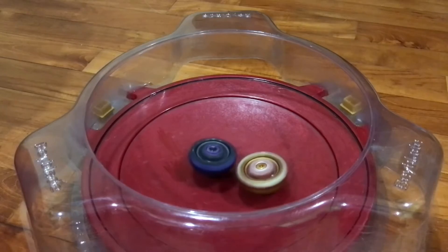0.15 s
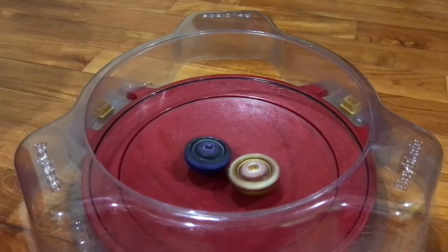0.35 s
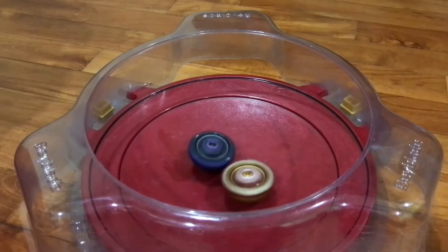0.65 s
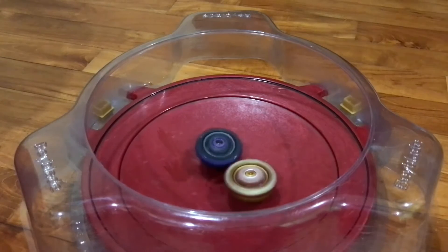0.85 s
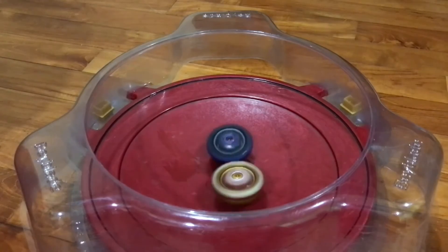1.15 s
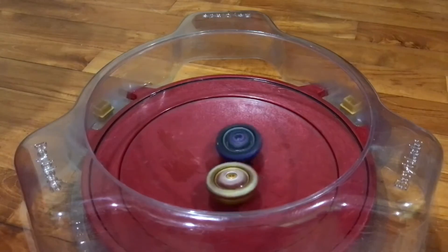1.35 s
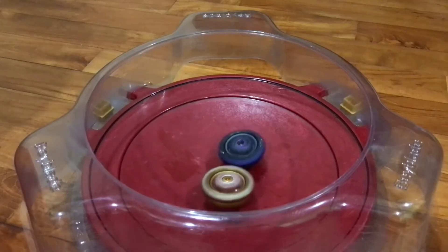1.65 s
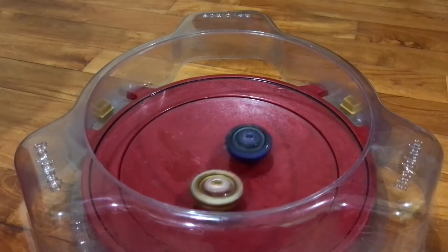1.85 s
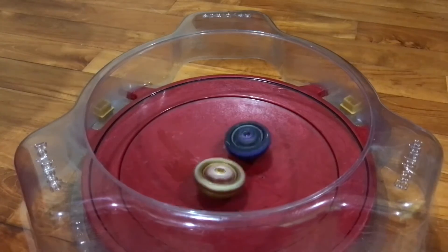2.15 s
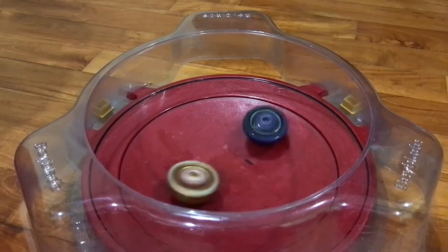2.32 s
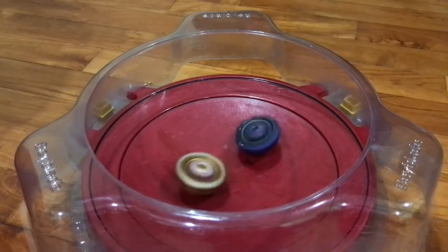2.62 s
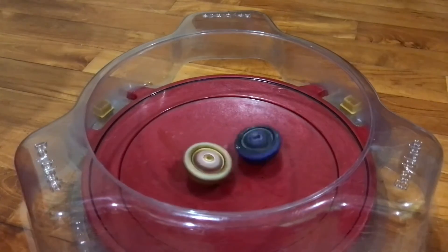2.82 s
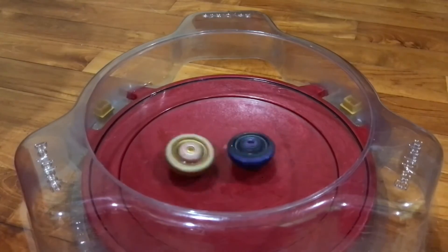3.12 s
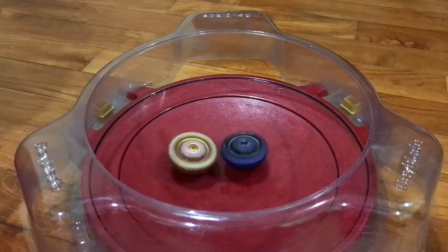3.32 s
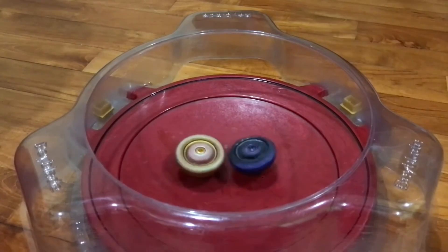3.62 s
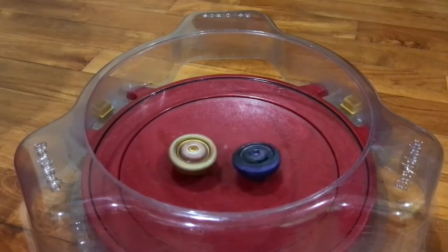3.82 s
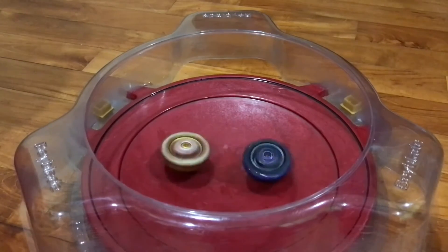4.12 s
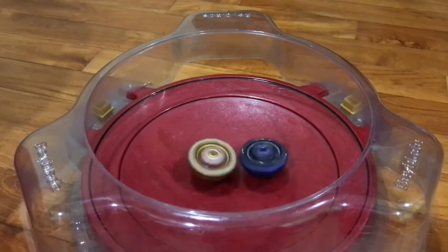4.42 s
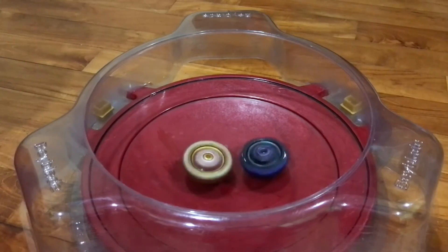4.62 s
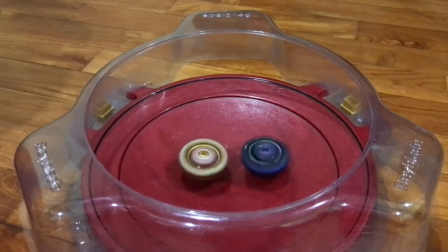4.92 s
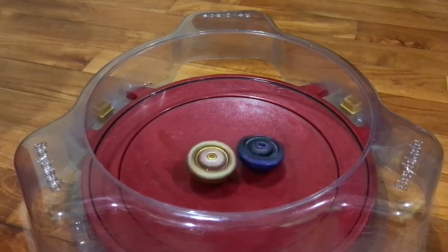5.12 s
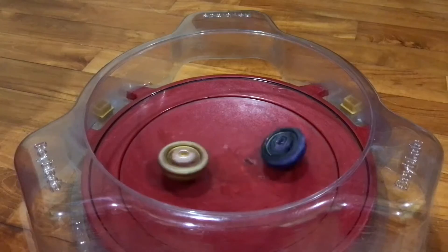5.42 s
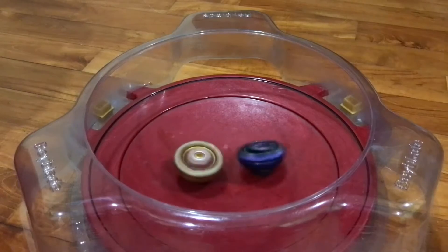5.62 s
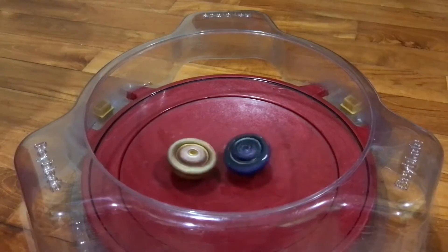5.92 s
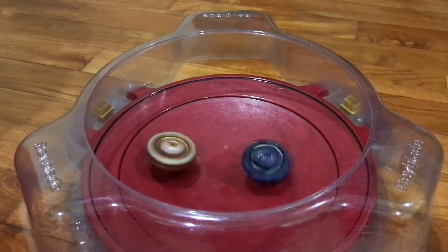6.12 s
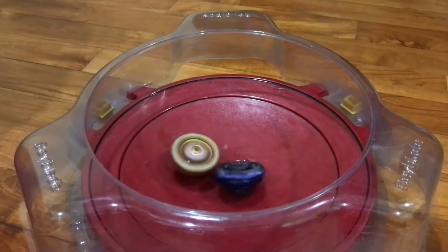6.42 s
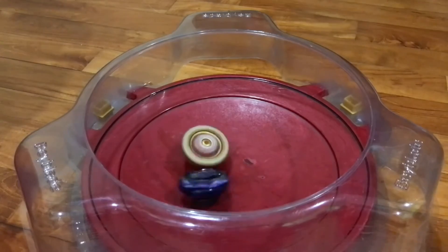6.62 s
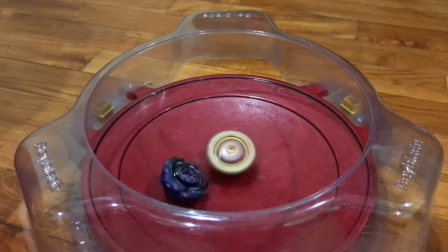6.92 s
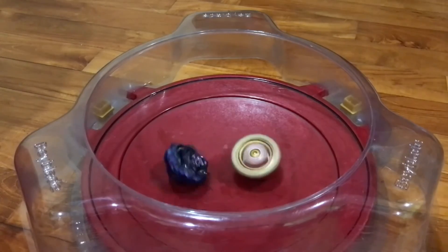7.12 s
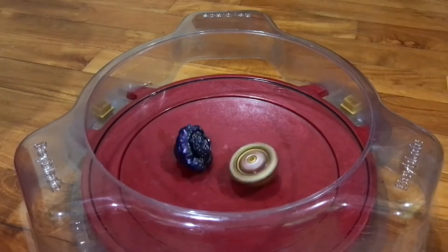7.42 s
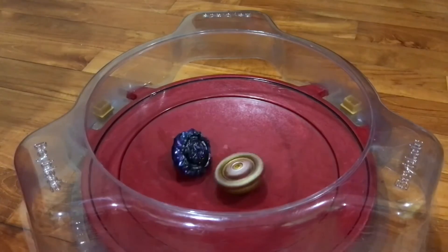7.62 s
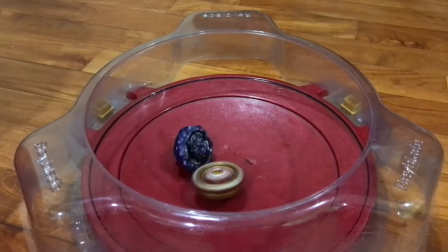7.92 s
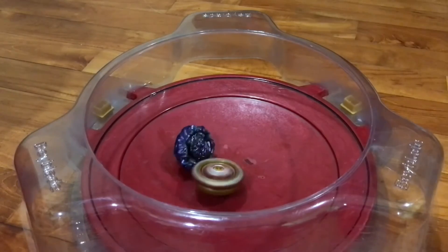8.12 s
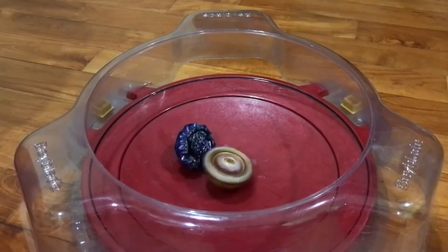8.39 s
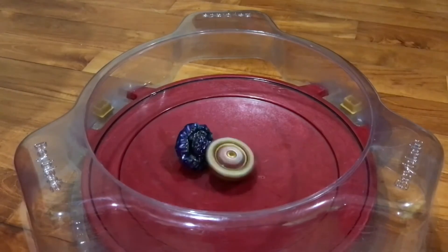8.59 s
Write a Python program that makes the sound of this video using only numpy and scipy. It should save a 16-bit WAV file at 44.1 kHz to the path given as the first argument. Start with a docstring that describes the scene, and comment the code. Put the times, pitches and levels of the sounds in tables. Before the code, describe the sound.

A close microphone in a small room catches toy tops spinning and colliding on a thin plastic floor. Crisp metal clacks dominate the first six seconds, with fluttering tip rumble, small ticks and two tiny squeaks between them. Then clashes become sparse, and a toppling top drums, rubs and scrapes unevenly, with rapid faint chirps, a run of even ticks and late isolated cracks over low room noise.

```python
"""Metallic clashes, often double, over a once-a-turn rumble: two metal-rimmed toy tops spin down, close by.
Each clash cracks, knocks the shell, thumps the plastic arena floor and rings the rims; noise and modal filters.
Worn tips drum and grind on the floor; tilted rims tick and rub, tips squeak, and hard blows heave the arena.
Near the end one top leans over, scrapes and chirps. Low air noise lies under it all.
The opening scrape is the dying ring of a clash before the start."""
import sys
import numpy as np
from scipy import signal
from scipy.fft import rfft, irfft, next_fast_len
from scipy.io import wavfile
from scipy.ndimage import uniform_filter1d, map_coordinates

SR = 44100
rng = np.random.default_rng(int(sys.argv[2]) if len(sys.argv) > 2 else 0)


def int16_out(signal):
    """Quantize to a 16-bit WAV file."""
    q = np.round(np.clip(np.atleast_2d(signal).T, -1, 1) * 32767)
    wavfile.write(sys.argv[1], SR, q.astype(np.int16))


N = 385875
TIME = np.arange(N) / SR  # s

# bright hiss of a metal contact: f/Hz, density/dB
SIZZLE = [(3000, -29.5), (6500, -11.5), (8400, -2), (9600, 2), (10500, -5), (11700, 0), (13500, -2),
          (15500, -2.5)]


def amp(db):
    """Decibels to gain."""
    return 10 ** (np.asarray(db) / 20)


def unit(x):
    """Scale to rms 1."""
    return x / np.sqrt(np.mean(x ** 2) + 1e-20)


def along(points, hz):
    """Interpolate (Hz, value) points on a log frequency axis."""
    f, v = np.transpose(points)
    return np.interp(np.log(hz + 1), np.log(f + 1), v)


def curves(rows):
    """One value per sample for each column after the time."""
    s, *cols = np.transpose(rows)
    return [np.interp(TIME, s, c) for c in cols]


def wobble(rate_hz):
    """Smooth random curve, rate_hz knots a second."""
    knots = rng.standard_normal(int(N * rate_hz / SR) + 4)
    return map_coordinates(knots, [TIME * rate_hz])


def filtered(x, response):
    """x times a complex response of frequency."""
    m = next_fast_len(len(x) + 8192)
    spectrum = rfft(x, m) * response(np.fft.rfftfreq(m, 1 / SR))
    return irfft(spectrum, m)[:len(x)]


def noise(spectrum, ripple_db=0, spacing_hz=70):
    """Coloured noise of rms 1; the ripple stands for the crowded fixed resonances of the parts."""
    knots = rng.standard_normal(2000)

    def gain(hz):
        ripple = ripple_db * np.interp(hz / spacing_hz, np.arange(len(knots)), knots)
        return amp(along(spectrum, hz) + ripple)

    return unit(filtered(rng.standard_normal(N), gain))


def add(track, s, sound):
    """Mix a sound into a track at time s."""
    part = track[max(round(s * SR), 0):][:len(sound)]
    part += sound[:len(part)]


def swells(rows):
    """Sum of gains, each rising to its row's level by the start, holding to the end and dying away."""
    rise_db_per_s, fall_db_per_s = 249.5, 209.5
    total = 0
    for start, end, db in rows:
        rise_db = rise_db_per_s * np.maximum(start - TIME, 0)
        fall_db = fall_db_per_s * np.maximum(TIME - end, 0)
        total = total + amp(db - rise_db - fall_db)
    return total


def room(x, wet_db, size=16000):
    """x plus a noise tail; bands of negative t60 grow, so a late narrow echo near 5.5 kHz dominates it."""
    # f/Hz, t60/s (negative: the band grows)
    decay = [(150, -0.16), (500, 0.25), (2000, 0.47), (10000, -0.29)]
    # f/Hz, initial level/dB
    colour = [(150, 1.5), (400, 5.5), (1200, 8.5), (9000, -1.5)]
    hz, t, z = signal.stft(rng.standard_normal(size), SR, nperseg=256)
    level_db = along(colour, hz)[:, None] - 60 * t / along(decay, hz)[:, None]
    tail = signal.istft(z * amp(level_db), SR, nperseg=256)[1]
    tail = tail * (1 - np.exp(-np.arange(len(tail)) / SR / 0.0035))
    wet = amp(wet_db) * signal.fftconvolve(x, tail / np.linalg.norm(tail))
    return wet + np.pad(x, (0, len(wet) - len(x)))


def air():
    """Low noise of the room, drifting slowly in level."""
    # f/Hz, density/dB
    air_spectrum = [(20, -29), (35, -22), (49, 0.5), (62, -4.5), (120, -5.5), (200, -9), (400, -21),
                    (1000, -20), (3000, -35.5), (8000, -31.5), (16000, -47)]
    return amp(-56.5 + wobble(3)) * noise(air_spectrum)


def arena(force):
    """The thin floor answers a force with its drum-like modes, as parallel band-passes."""
    # f/Hz, width/Hz, level/dB
    floor_modes = [(72, 17, -19), (117, 9.5, -9.5), (143.5, 23, -3), (238, 56, -10.5), (305.6, 45.6, 2),
                   (340.5, 21.5, 5.5), (433, 60, -17.5), (520.5, 37, -17), (581, 18, -11.5), (666, 24, -34),
                   (920, 100, -18), (1080, 49, -21)]
    return filtered(force, lambda f: sum(amp(db) * 1j * f * w / (c * c - f * f + 1j * f * w)
                                         for c, w, db in floor_modes))


def turns():
    """Turns made so far by the drumming top; friction takes the same share of the spin every second."""
    start_spin_hz, spin_life_s = 61.1, 11
    return start_spin_hz * spin_life_s * (1 - np.exp(-TIME / spin_life_s))


def leaning(s):
    """How far the slowing top has leaned over at time s, 0 to 1."""
    lean_from_s, lean_full_s = 5.4, 6.7
    return np.interp(s, [lean_from_s, lean_full_s], [0, 1])


def bumps(main_db, scatter_db, jitter_turns, count=7):
    """Tip flaws strike the floor in the same order every turn, drifting as it tilts; one is the largest."""
    turn = turns()
    whole = np.arange(int(turn[-1]))[:, None]

    def drift():
        steps = rng.standard_normal((500, count))
        return unit(uniform_filter1d(steps, size=8, axis=0))[:len(whole)]

    flaw = np.arange(count)
    angle = (flaw + .3 * drift() * (flaw > 0)) / count  # turns
    jitter = jitter_turns * rng.standard_normal((500, count))[:len(whole)]
    at = np.interp(whole + angle + jitter, turn, np.arange(N))  # samples
    force = amp(scatter_db * drift() + main_db * (flaw == 0))
    force = force / np.sqrt(np.sum(force ** 2, axis=1, keepdims=True))
    return unit(np.bincount(at.astype(int).ravel(), force.ravel(), N))


def strokes(bite_db, second_db, uneven_db):
    """Envelope of rms 1: the worn side of the tip bites once a turn, less firmly halfway between."""
    angle = 2 * np.pi * (turns() - .08)
    level_db = bite_db * np.cos(angle) + second_db * np.cos(2 * angle) + uneven_db * wobble(110)
    return unit(amp(level_db))


def rolling():
    """Bumps drum the floor under scraping and grinding noise in strokes; a leaning top drums less evenly."""
    # fast runs on the edge of a tip: start/s, end/s, rumble/dB
    runs = [(0, .03, -46.5), (.255, .6, -42), (1.43, 1.54, -37.5), (2.12, 2.33, -35.5), (2.64, 2.8, -36.5),
            (2.93, 3.14, -39), (5.67, 5.7, -45.5), (6.21, 6.23, -44)]
    # scraping and grinding noise under the tips; the first row is the dying ring of a clash before the start:
    # t/s, rumble/dB, scrape drive/dB before the trims below
    tip_levels = [(0, -54, -40), (.13, -60, -61), (.9, -58.5, -57.5), (3.3, -65, -64.5), (3.6, -56.5, -60),
                  (5.1, -59, -64), (5.5, -50, -57.5), (5.97, -59, -63.5), (6.4, -53, -58),
                  (6.75, -51.5, -59.5), (7.03, -41.5, -59.5), (7.36, -47, -58), (7.5, -42.5, -52),
                  (7.9, -41.5, -52.5), (8.05, -54, -63.5), (8.24, -42.5, -59), (8.52, -43.5, -58),
                  (8.68, -58.5, -66)]
    # push of a rolling top on the floor: f/Hz, gain/dB
    weight = [(60, 3), (115, 6), (190, 7.5), (300, -1), (380, 0.5), (600, 1.5), (1100, -2)]
    # grit under the tip: f/Hz, density/dB
    grit_spectrum = [(400, -15.5), (750, -12.5), (980, 15), (1300, -19), (1520, 13), (1700, -5), (2000, 1),
                     (2700, 8.5), (3400, -12), (5000, -9.5), (9000, -23.5), (16000, -32)]
    # metal scrape: f/Hz, density/dB
    scrape_spectrum = [(1500, -35.5), (3500, -5), (4700, -3), (5600, 2), (7200, -2), (8200, -6.5),
                       (8550, 8), (9000, -5), (10500, -13), (15500, -8)]
    run_grit_db, run_scrape_db = -12, -24  # re the rumble of a run
    run = swells(runs)
    drumming, scraping = amp(curves(tip_levels))
    pulses = bumps(main_db=7.5, scatter_db=4.0, jitter_turns=0.0037)
    bite = strokes(bite_db=3.2, second_db=3, uneven_db=2.5)
    force = pulses + (0.46 + 0.75 * leaning(TIME)) * bite * rng.standard_normal(N)
    # the weight of a top rocks the whole arena, so its slow modes carry more of the rumble
    push = filtered(force, lambda hz: amp(along(weight, hz)))
    rumble = amp(0.78 * wobble(14)) * np.hypot(run, drumming) * unit(arena(push))
    grit_level = np.hypot(amp(run_grit_db) * run, amp(-6.0) * scraping)
    grit = grit_level * bite * noise(grit_spectrum, ripple_db=-0.5)
    scrape_level = np.hypot(amp(run_scrape_db) * run, amp(-2.5) * scraping)
    scrape = scrape_level * bite * noise(scrape_spectrum, ripple_db=3.5)
    return room(rumble + grit + scrape, wet_db=-10.5)[:N]


def contacts():
    """Every blow, and the light touch that comes just before some of them."""
    # rim on rim: t/s, lead of a light first touch/s (0: none), base crack/dB, brightness/dB,
    # then re the base crack: shell knock/dB, floor thump/dB, long ring/dB, short ring/dB, high ring/dB
    rim_blows = [(0.0314, 0.0012, -13, 0.5, -39, -37, -36.5, -21, -32),
                 (0.0483, 0, -14.5, 3, -23, -34, -39.5, -24, -49),
                 (0.1453, 0.0024, -16.5, -4.5, -13, -17.5, -46, -39, -47),
                 (.284, 0.0019, -15, -1, -15, -27, -46, -47, -46),
                 (0.3458, 0, -17.5, -1.5, -17.5, -27, -43, -36, -44),
                 (.3685, 0, -23.5, -2, -13, -25, -44.5, -34, -43),
                 (0.5337, 0, -15, 0.5, -17.5, -22, -47, -40.5, -45),
                 (0.7492, 0.0025, -26.5, -2, -24, -21, -47, -44, -42),
                 (0.7617, .003, -12, 2, -22.5, -21.5, -41, -44.5, -45),
                 (0.9403, 0.0021, -32, 1, -25, -21, -49, -42, -35),
                 (0.9466, 0.0023, -10, 1, -17, -20, -49.5, -39, -38),
                 (.9509, 0, -13.5, -6, -22.5, -18.5, -48, -45, -41),
                 (1.1782, 0.00096, -11, -0.5, -18, -18, -45.5, -36.5, -39.5),
                 (1.1828, 0.0029, -13.5, 8, -13, -22, -45.5, -41, -40.5),
                 (1.2886, 0, -11.5, -0.5, -14.5, -16, -48, -35, -34),
                 (1.3644, 0.0016, -15.5, -3, -13.5, -19, -48.5, -43, -44.5),
                 (1.5234, 0.0045, -12.5, 3, -30, -27, -48, -45, -43),
                 (1.5298, 0, -13.5, 5, -17, -23, -42, -50.5, -47),
                 (1.691, 0, -15.5, 2.5, -19.5, -36, -39, -33, -42.5),
                 (1.6971, 0, -11, -2, -18.5, -28, -37, -38, -37),
                 (1.84, .008, -7.5, 2.5, -19, -20, -33, -32, -23),
                 (2.252, 0.0022, -15, -2.5, -23, -24, -46, -45, -34),
                 (2.2582, 0.0049, -9.5, 1, -17.5, -23, -43, -45, -38),
                 (2.7576, 0.0047, -11, -4.5, -20.5, -21.5, -43, -32, -41),
                 (2.9552, 0.0032, -15.5, 2.5, -21.5, -27, -47.5, -47, -43),
                 (2.9602, 0, -13, 6.5, -16.5, -20.5, -48.5, -45, -43),
                 (3.0936, 0.001, -22.5, -2, -16, -20, -39.5, -29, -27),
                 (3.122, 0.0054, -11.5, 0, -18, -21, -54, -38, -28),
                 (3.3855, 0.011, -10.5, -2.5, -15, -24.5, -34, -39, -29),
                 (3.6442, 0.011, -13, 1.5, -18, -16.5, -32, -38.5, -28),
                 (3.7591, 0.00036, -9, 6, -23, -22.5, -47.5, -42, -36),
                 (3.7686, 0, -14, 1, -19.5, -15, -46, -42, -39),
                 (4.0253, 0, -12, 6, -29, -17, -48.5, -41.5, -47),
                 (4.031, 0, -12, 0, -19, -11.5, -47, -42.5, -46),
                 (4.433, 0.0013, -11.5, -1, -18, -28, -45, -22, -39),
                 (4.4519, 0, -16, 2, -33.5, -26, -40, -33, -44),
                 (4.5371, 0.014, -19.5, -2, -10, -19, -42, -36, -39),
                 (4.6234, 0, -18.5, -3.5, -8, -18.5, -45, -37, -34.5),
                 (4.8402, 0.0022, -14, -1, -16.5, -9.5, -48, -41, -30),
                 (5.1601, 0.0011, -19, 5.5, -17, -26.5, -45.5, -42, -47.5),
                 (5.2061, 0, -8.5, 2.5, -19.5, -25, -51, -42.5, -24),
                 (5.7187, 0.00072, -10.5, -0.5, -15.5, -20, -36.5, -34, -38),
                 (5.777, 0.00049, -16, -1.5, -15.5, -18, -32, -41, -41),
                 (6.0202, 0.0011, -8, 0, -22.5, -17.5, -48, -35, -45),
                 (6.4672, 0.00093, -12.5, 2.5, -17.5, -13.5, -48, -45, -41),
                 (6.5305, 0.0068, -19, 1.5, -11, -18.5, -48, -45, -37),
                 (6.613, 0.00099, -24.5, 0.5, -13.5, -17.5, -43, -40, -39),
                 (7.9283, 0.0013, -16, -0.5, -12.5, -12, -35.5, -40, -37),
                 (8.296, 0.0029, -16, 0.5, -17, -12, -48, -49, -41),
                 (8.6835, 0.0023, -29, -4, -17, -24, -45, -39, -44),
                 (8.711, 0, -15.5, 0, -13.5, -23.5, -42, -42, -44)]
    touch_db = -10  # re the blow that follows
    blows = [(s, db, *colour) for s, lead, db, *colour in rim_blows]
    touches = [(s - lead, db + touch_db, *colour) for s, lead, db, *colour in rim_blows if lead > 0]
    return np.transpose(blows + touches)


def bursts(times, levels_db, hold_s, fade_s, fade_db, wet_db, t60_s, size=18000):
    """Envelope of blows: each chatters for an instant, fades in the body and is carried on by the room."""
    t = np.arange(size) / SR
    chatter = (1 - np.exp(-t / 0.00017)) / np.sqrt(1 + (t / hold_s) ** 4)
    direct = chatter + amp(fade_db) * np.exp(-t / fade_s)
    tail = (1 - np.exp(-t / 0.0036)) * amp(wet_db - 60 * t / t60_s)
    shape = direct ** 2 + tail ** 2
    power = np.zeros(N)
    for s, db in zip(times, levels_db):
        add(power, s, amp(2 * db) * shape)
    return np.sqrt(power)


def thumps(times, levels_db, clatter_db, settle_s, size=4000):
    """The tip lands on the floor just after each blow and clatters until it settles."""
    t = np.arange(size) / SR
    force = np.zeros(N)
    for s, db in zip(times, levels_db):
        u = (t - .005) / (0.00063 * amp(rng.normal(0, 1)))
        landing = -u * np.exp(-u ** 2)
        swell = (1 - np.exp(-t / .004)) * np.exp(-t / settle_s)
        clatter = amp(clatter_db) * swell * rng.standard_normal(size)
        add(force, s, amp(db + 20.0) * (clatter + landing))
    return arena(force)


def heave(hz, life_s, size=7000):
    """A hard blow rocks the whole arena for a few slow cycles: three detuned, decaying sines."""
    t = np.arange(size) / SR
    sway = sum(np.sin(2 * np.pi * f * t) for f in hz * amp(rng.normal(0, 1.8, 3)))
    return unit(sway) * (1 - np.exp(-t / 0.0027)) * np.exp(-t / life_s)


def metal(times, ring_db):
    """The rims ring on as two-pole resonators; spinning splits their modes into close, beating lines."""
    # ring (0 long, 1 short, 2 high), f/Hz, level/dB, t60/s
    rim_modes = [(0, 5303, -1, 1.02), (0, 5360, -4, 1.1), (0, 5270, -16, 1.0), (1, 5430, -2, 0.36),
                 (1, 5540, -3, .4), (1, 5620, 0, 0.37), (1, 5600, -6, 0.43), (2, 8500, -14, .45),
                 (2, 8560, 0, 0.26), (2, 8940, -2, 0.28), (2, 7130, -7.5, 0.23), (2, 11430, -9.5, 0.23),
                 (2, 14800, -13, 0.17)]
    out = np.zeros(N)
    for ring, hz, db, t60 in rim_modes:
        sizes = amp(ring_db[round(ring)] + db + rng.normal(0, 1.5, len(times)))
        r, w = amp(-60 / (t60 * SR)), 2 * np.pi * hz / SR
        at = (times * SR).astype(int) + rng.integers(0, 10, len(times))
        blows = np.bincount(at, sizes, N)
        out += signal.lfilter([np.sin(w)], [1, -2 * r * np.cos(w), r * r], blows)
    return out


def clashes():
    """The rims strike each other: crack, sizzle, shell knock, floor thump, heave and ringing metal."""
    # crack: f/Hz, density/dB
    crack_spectrum = [(700, -31), (1500, -21), (2300, -10), (3300, -6), (4200, -2), (6000, 0), (7100, 2.5),
                      (7600, -4.5), (8400, -0.5), (9600, -4), (11000, -10.5), (16000, -19.5)]
    # shell knock: f/Hz, density/dB
    shell_spectrum = [(300, -16), (620, -1.5), (820, -13), (1000, 2), (1140, 4), (1400, -10.5), (1750, -6),
                      (2150, 1.5), (2800, -5.5), (5000, -33.5)]
    # heave for a 0 dB blow between upright tops, its growth per dB of blow, its gain at full lean
    heave_db, heave_grows, heave_lean_db = -48, 0.38, 11
    s, db, bright_db, knock_db, thump_db, *ring_db = contacts()
    crack = bursts(s, db - 2.5 - 0.61 * bright_db, hold_s=0.0025, fade_s=0.01,
                   fade_db=-15.0, wet_db=-14.0, t60_s=0.24) * noise(crack_spectrum, ripple_db=1.5)
    sizzle = bursts(s, db - 0.5 + 0.3 * bright_db, hold_s=0.0022, fade_s=0.0092,
                    fade_db=-12.5, wet_db=-15.5, t60_s=0.19) * noise(SIZZLE, ripple_db=2.0)
    knock = bursts(s, db + knock_db - 2.5, hold_s=0.0072, fade_s=0.012,
                   fade_db=-12.5, wet_db=-8, t60_s=0.23) * noise(shell_spectrum, ripple_db=2.5)
    low = room(thumps(s, db + thump_db, clatter_db=-15.0, settle_s=0.024), wet_db=-5.5)[:N]
    for at, level_db in zip(s, heave_db + heave_grows * db + heave_lean_db * leaning(s)):
        add(low, at, amp(level_db) * heave(hz=167, life_s=0.051))
    return crack + sizzle + knock + low + metal(s, np.array(ring_db) + db)


def bounces():
    """After a hard blow the arena heaves, and a top hops on its tip and rattles the floor."""
    # first bounce t/s, rattle/dB before a +4 dB trim, settling time/s, heave/dB
    hops = [(1.855, -37.5, 0.029, -60), (2.775, -45, 0.037, -37), (3.134, -39, .03, -38),
            (3.4, -35.5, 0.037, -40), (5.22, -33.5, 0.03, -32.5), (5.736, -32.5, .039, -39.5),
            (6.04, -28, 0.037, -39), (6.485, -34, 0.024, -49), (7.943, -45, 0.026, -34),
            (8.311, -40.5, 0.05, -35), (8.726, -50, .03, -38)]
    hop_s = .015  # from the blow to the first bounce
    t = np.arange(SR // 3) / SR
    level, sway = np.zeros(N), np.zeros(N)
    for s, db, settle_s, heave_db in hops:
        add(level, s, amp(db + 4.0) * (1 - np.exp(-t / 0.004)) * np.exp(-t / settle_s))
        add(sway, s - hop_s, amp(heave_db) * heave(hz=165, life_s=0.028))
    return level * unit(arena(rng.standard_normal(N))) + sway


def grazes():
    """A tilted rim ticks and rubs on the floor in even series and rings softly; a tip squeaks twice."""
    # start/s, number of grazes, gap/s, tick/dB before a +6 dB trim, rub/dB, floor thump/dB,
    # ring/dB before a +1 dB trim
    graze_series = [(2.13, 6, 0.017, -61.5, -46, -48.5, -71.5), (2.314, 1, .02, -40, -39, -35, -70),
                    (2.4451, 4, 0.048, -45.5, -52.5, -51, -73), (2.6319, 5, 0.026, -48, -43, -37, -72),
                    (3.158, 1, .02, -35, -50.5, -42, -68.5), (4.748, 1, .02, -50, -51, -52, -80.5),
                    (5.0515, 1, .02, -58, -60, -58, -81), (5.441, 2, .0185, -51, -54, -54, -77),
                    (6.1964, 1, .03, -47.5, -39, -43, -78), (6.2564, 2, .023, -55, -46.5, -45, -75),
                    (7.274, 1, .03, -62, -44, -38, -81), (7.4301, 14, 0.034, -56.5, -40.5, -42, -52),
                    (8.238, 2, 0.032, -58, -46, -43, -68), (8.4145, 2, .03, -62, -47, -47, -74)]
    # rub: f/Hz, density/dB
    rub_spectrum = [(400, -13), (1000, 5), (1500, 1.5), (2200, -2), (2700, 2), (3400, -4.5), (4200, -2),
                    (4800, 3), (5300, -8.5), (7000, -8), (9000, -16), (16000, -29)]
    # tip squeaks: t/s, f/Hz, level/dB
    squeaks = [(2.334, 4220, -33), (2.614, 4250, -36)]
    # per graze; every second one lighter; extra ring loss per graze
    loss_db, light_db, ring_loss_db = 0.36, 2, 1
    series = []
    for start, count, gap, *levels_db in graze_series:
        for k in range(round(count)):
            series.append((start + k * gap, k, *(np.array(levels_db) - loss_db * k - light_db * (k % 2))))
    s, place, tick_db, rub_db, thump_db, ring_db = np.transpose(series)
    out = bursts(s, tick_db + 6.0, hold_s=0.0021, fade_s=.005,
                 fade_db=-19, wet_db=-20, t60_s=.24) * noise(SIZZLE, ripple_db=6.5)
    out += bursts(s, rub_db, hold_s=0.0062, fade_s=.006,
                  fade_db=-17.0, wet_db=-17.5, t60_s=.26) * noise(rub_spectrum, ripple_db=3)
    out += thumps(s, thump_db, clatter_db=-18.5, settle_s=.01)
    t = np.arange(SR // 4) / SR
    for at, db in zip(s, ring_db - ring_loss_db * place):
        ring = sum(np.sin(2 * np.pi * (hz * t + rng.random())) for hz in (8490, 8550, 8612))
        add(out, at, amp(db + 1 - 60 * t / .3) * ring)
    for at, hz, db in squeaks:
        squeak = np.exp(-((t - .005) / 0.0028) ** 2) * np.sin(2 * np.pi * hz * t)
        add(out, at, amp(db) * room(squeak, wet_db=-11.5))
    return out


def chirps(start_hz, end_hz, width_hz, second_db):
    """The side of a leaning tip sticks and slips twice a turn in short falling chirps, the second weaker."""
    # start/s, end/s, level/dB before the mix gain
    chirp_spells = [(6.72, 7.2, -57), (6.92, 7.01, -52), (8.14, 8.6, -60)]
    half, stroke = np.divmod(2 * turns(), 1)
    pitch_hz = np.interp(stroke, [0, .4], [start_hz, end_hz]) + width_hz * wobble(2900)
    swell = np.exp(-((stroke - .2) / 0.12) ** 2) * amp(second_db * (half % 2) + 2 * wobble(43))
    tone = np.sin(2 * np.pi * np.cumsum(pitch_hz) / SR)
    return room(swells(chirp_spells) * swell * tone, wet_db=-11)[:N]


def scene():
    """The battle over the low noise of the room."""
    chirping = amp(2.5) * chirps(start_hz=9100, end_hz=5700, width_hz=560, second_db=-2)
    return (air() + rolling() + clashes() + bounces() + grazes() + chirping)[None]


def record(dry):
    """The loudest peaks are rounded off, and a steep low-pass sets the band limit."""
    top_hz = 15900
    rounded = dry[0] / (1 + np.abs(dry[0] / .95) ** 6) ** (1 / 6)
    return filtered(rounded, lambda hz: 1 / np.sqrt(1 + (hz / top_hz) ** 200))[None]


dry = scene()
out = record(dry)
int16_out(out)
```